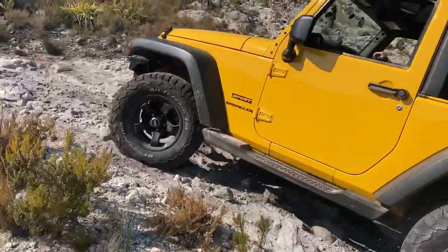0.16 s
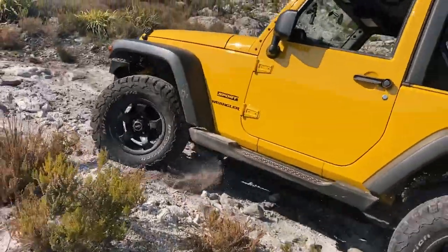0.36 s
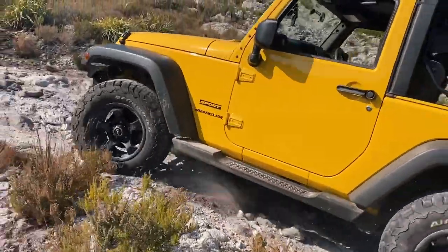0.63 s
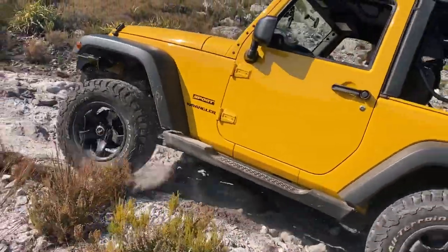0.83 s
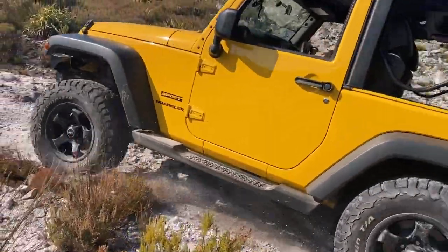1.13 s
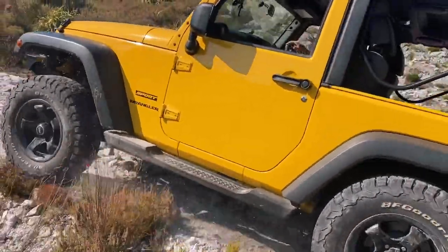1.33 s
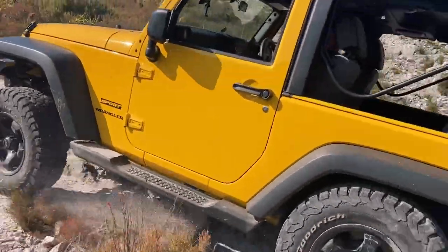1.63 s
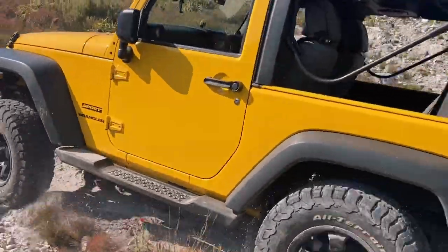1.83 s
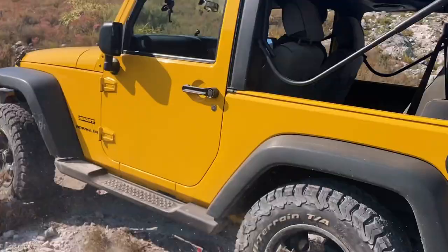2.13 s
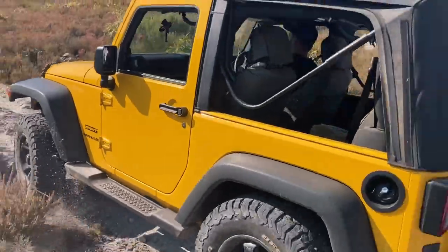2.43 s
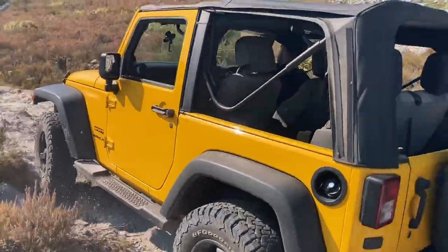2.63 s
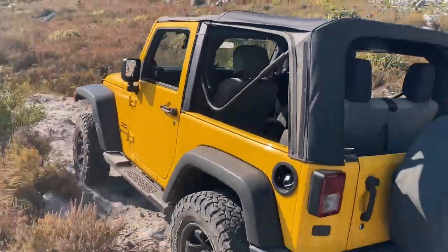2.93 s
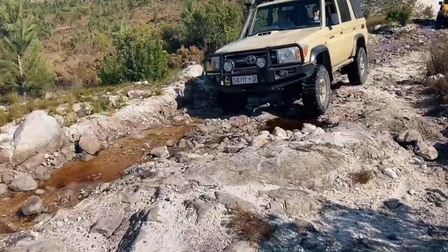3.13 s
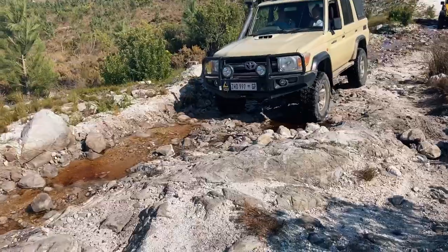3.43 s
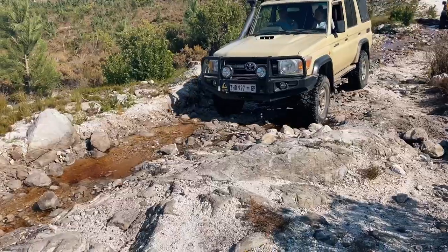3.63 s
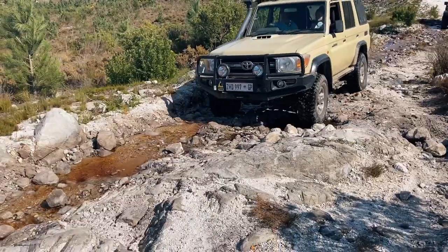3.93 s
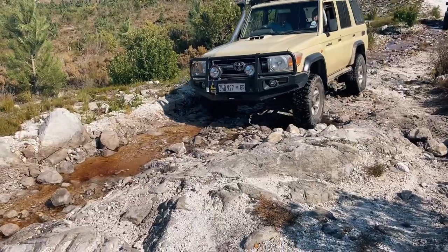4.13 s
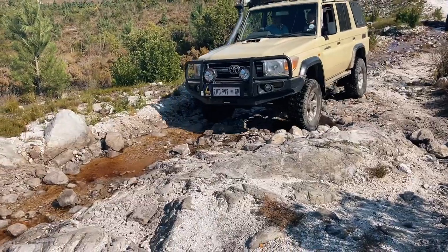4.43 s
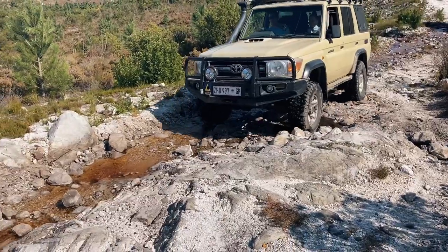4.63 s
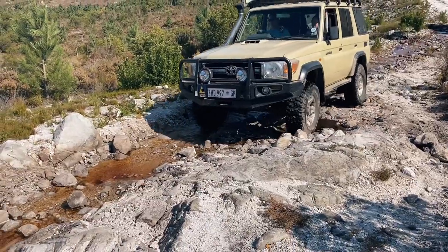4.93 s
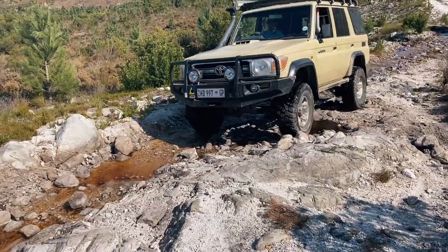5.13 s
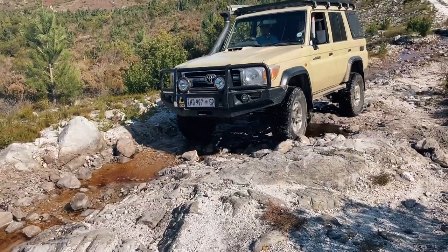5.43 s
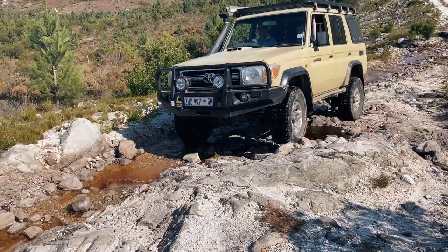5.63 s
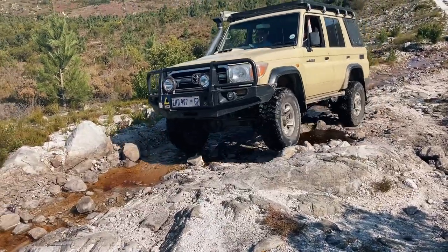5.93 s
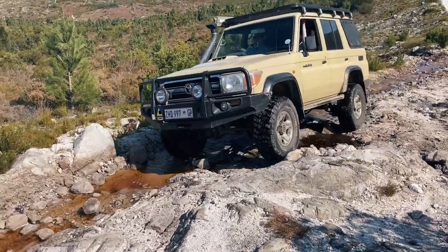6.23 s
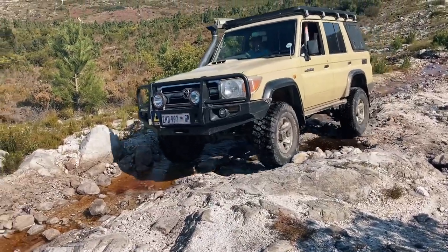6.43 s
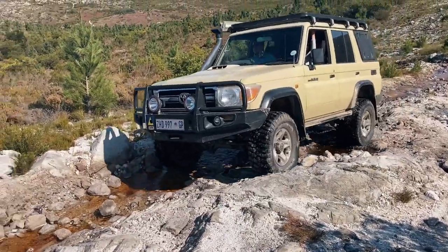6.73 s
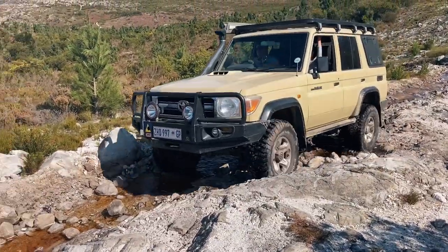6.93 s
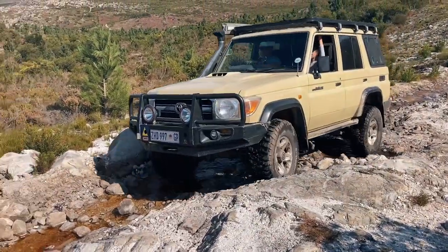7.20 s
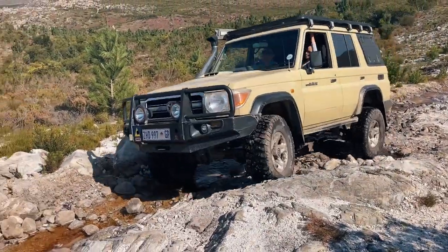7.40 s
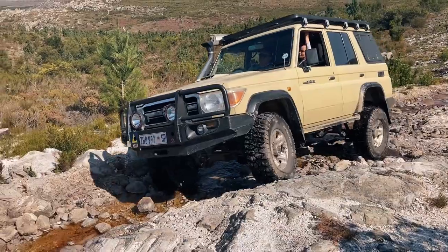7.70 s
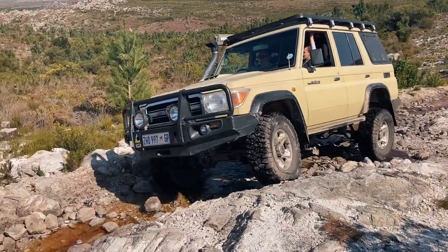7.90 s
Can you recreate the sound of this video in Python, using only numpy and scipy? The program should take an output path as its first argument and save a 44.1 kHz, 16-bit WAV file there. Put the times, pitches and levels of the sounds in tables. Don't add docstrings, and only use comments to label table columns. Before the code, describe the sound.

Outdoors on a rocky trail, in close stereo without obvious reverberation. From 0 to 3.1 seconds a petrol car scrabbles past: low body rumble, tyres grinding loose stones, bright grit spitting, and short dull rock thumps on the chassis, strongest near 1.2. A low engine hum wavers and sags, with gear tones gliding around 0.6 to 1.7; the grinding weakens after about 2.5. At 3.1 the scene cuts hard to a diesel off-roader at low, uneven idle, speeding up and slowing in waves. Exhaust throbs beneath clatter and airy fan rush, which grow nearer and fuller. Sparse stone cracks punctuate the crawl. From about 4.5 a thin, high brake squeal creeps in, wavering slightly upward, with a sharp squeak near 5.7 and repeated chirps from 6.6 to 7.7. Around 7.9 a front tyre crunches into gravel as the engine continues.

```python
import sys
import numpy as np
from scipy import signal
from scipy.fft import rfft, irfft, next_fast_len
from scipy.io import wavfile
from scipy.ndimage import uniform_filter1d, map_coordinates

SR = 44100
rng = np.random.default_rng(int(sys.argv[2]) if len(sys.argv) > 2 else 0)


def attenuation_scalar(level_db):
    decades = np.asarray(level_db, float) / 20
    return 10 ** decades


def put_to_file(sound):
    columns = np.atleast_2d(sound).T
    safe = np.clip(columns, -1, 1)
    whole_steps = np.round(safe * 32767)
    wavfile.write(sys.argv[1], SR, whole_steps.astype(np.int16))


N = 355446
TIME = np.arange(N) / SR
CUT_S = 3.105

# (frequency [Hz], density [dB per Hz])
GRIND_SPECTRUM = [(250, -23.5), (420, 1), (957, -7.5), (1090, -8), (1310, -10), (1570, -8.5), (1880, -12.5),
                  (2560, -13), (4500, -25), (5850, -24), (9900, -120)]
# (frequency [Hz], correlation [-1..1])
ALIKE_DIESEL = [(60, 0.99), (150, 1), (380, 0.95), (950, 0.66), (2380, 0.59), (5980, -0.49), (15000, 0.25)]


def unit(x):
    return x / np.sqrt(np.mean(x ** 2) + 1e-20)


def along(points, hz):
    f, v = np.transpose(points)
    return np.interp(np.log(hz + 1), np.log(f + 1), v)


def curves(rows):
    s, *cols = np.transpose(rows)
    return [np.interp(TIME, s, c) for c in cols]


def span(start_s, end_s, fade_s=.02):
    return np.clip(np.minimum(TIME - start_s, end_s - TIME) / fade_s + .5, 0, 1)


def wobble(rate_hz):
    knots = rng.standard_normal(int(N * rate_hz / SR) + 4)
    return map_coordinates(knots, [TIME * rate_hz])


def filtered(x, response):
    m = 2 * next_fast_len(N // 2 + SR // 4)
    return irfft(rfft(x, m) * response(np.fft.rfftfreq(m, 1 / SR)), m)[..., :N]


def causal(points):
    def response(hz):
        cepstrum = irfft(np.log(attenuation_scalar(along(points, hz))))
        cepstrum[1:len(hz) - 1] *= 2
        cepstrum[len(hz):] = 0
        return np.exp(rfft(cepstrum))
    return response


def rush(spectrum, alike, grain, patchy_db):
    z = signal.stft(grain * rng.standard_normal((2, N)), nperseg=256)[2]
    field = uniform_filter1d(rng.standard_normal(z.shape[1:]), 4, 0)
    field = uniform_filter1d(field, 14, 1)
    pair = signal.istft(z * attenuation_scalar(patchy_db * unit(field)), nperseg=256)[1][:, :N]

    def mid_side(hz):
        turn = np.arccos(np.clip(along(alike, hz), -1, 1)) / 2
        return attenuation_scalar(along(spectrum, hz)) * [np.cos(turn), np.sin(turn)]
    mid, side = filtered(pair, mid_side)
    return unit(np.array([mid + side, mid - side]))


def cracks(rate_hz, spread_db, t60_s):
    size_db = spread_db * np.minimum(rng.exponential(size=N), 3)
    kicks = (rng.random(N) < rate_hz / SR) * attenuation_scalar(size_db)
    return 1 + signal.lfilter([1], [1, -attenuation_scalar(-60 / (t60_s * SR))], kicks)


def petrol_tyres_and_body():
    # (time [s], effort [dB], jolt [dB])
    scrabble = [
        (0.0, -33.5, -25),
        (0.14, -33.5, -34.5),
        (0.19, -32, -21.5),
        (1.09, -34.5, -29),
        (1.33, -31, -25),
        (2.68, -42.5, -38),
        (2.69, -40.5, -30.5),
        (3.07, -39, -40.5),
        (3.1, -40.5, -31),
    ]
    # (frequency [Hz], density [dB per Hz])
    rumble_spectrum = [(12, -59), (20, -31), (40, 2), (54, 12), (140, 10), (200, 1.5), (260, -26),
                       (440, -120)]
    chassis_spectrum = [(120, -42), (190, -7), (250, -3.5), (340, -5.5), (430, -16), (700, -44.5)]
    grit_spectrum = [(2000, -0.5), (3500, -3.5), (5500, -6), (7000, -6.5), (11000, -7), (15500, -17)]
    # (frequency [Hz], correlation [-1..1])
    alike_petrol = [(60, 0.72), (150, 0.82), (380, 0.94), (950, 0.63), (2380, 0.15), (5980, -0.18),
                    (15000, 1)]
    working_db, jolt_ref_db, lurch_db, grit_fall_s = -36, -27, 1.2, 0.44

    effort_db, jolt_db = curves(scrabble) - np.array([[working_db], [jolt_ref_db]])
    thrown_db = np.interp(TIME - grit_fall_s, TIME, effort_db)
    crunch = np.sqrt(cracks(rate_hz=40, spread_db=2, t60_s=.05))
    body_shake = cracks(rate_hz=37, spread_db=1.5, t60_s=0.052)
    frame_shake = cracks(rate_hz=60, spread_db=-1.9, t60_s=0.023)
    grit_hits = crunch * cracks(rate_hz=53, spread_db=5.5, t60_s=0.0018)

    def layer(db, spectrum, grain, patchy_db):
        gain = attenuation_scalar(db + lurch_db * wobble(6.95))
        return gain * rush(spectrum, alike_petrol, grain, patchy_db)
    out = layer(-28 + 0.59 * jolt_db, rumble_spectrum, body_shake, patchy_db=0.0)
    out += layer(-30 + 0.85 * jolt_db, chassis_spectrum, frame_shake, patchy_db=1.5)
    out += layer(-34.5 + effort_db, GRIND_SPECTRUM, crunch, patchy_db=1.5)
    out += layer(-44 + 1.15 * thrown_db, grit_spectrum, grit_hits, patchy_db=0.0)
    return out


def petrol_hum():
    # (start [s], end [s], start pitch [Hz], end pitch [Hz], level [dB])
    hums = [
        (0, 0.61, 101.4, 96.5, -29.5),
        (0.555, .85, 251, 230.7, -36.5),
        (1.006, 1.4, 227.4, 254, -32.5),
        (1.307, 1.747, 250.7, 236.7, -30.5),
        (1.104, 1.4, 70, 68.5, -31),
        (1.498, 1.73, 75.5, 71.2, -29),
        (1.813, 2.41, 66.4, 53.5, -31),
        (2.423, 3.15, 89.4, 92.5, -34),
        (2.804, 3.155, 180.8, 193.2, -38.5),
    ]
    out = np.zeros(N)
    for start_s, end_s, from_hz, to_hz, db in hums:
        hz = np.interp(TIME, [start_s, end_s], [from_hz, to_hz]) * (1 + .012 * wobble(12))
        level = span(start_s, end_s, 0.092) * attenuation_scalar(db + 1.5 + 1.2 * wobble(8.3))
        out += level * np.sin(2 * np.pi * np.cumsum(hz) / SR)
    return out


def thumps():
    # (time [s], peak [dB], pitch [Hz], t60 [s])
    rocks = [(0.037, -10, 235, 0.089), (0.191, -30, 156, 0.04), (0.28, -3, 215, 0.045),
             (0.367, -25, 121, 0.032), (0.43, -17, 95.5, 0.033), (0.539, -3, 246, 0.059),
             (0.948, -8, 91.5, 0.053), (1.219, 5.5, 146, 0.026), (1.33, -1, 250, 0.03),
             (1.412, -3, 250, 0.025), (1.824, -5, 143, 0.068), (1.931, -9, 297, 0.055),
             (2.393, -3.5, 171, 0.033), (2.453, -16, 110, 0.06), (2.698, -6, 110, 0.046),
             (2.892, -15, 102, 0.045)]
    out, t = np.zeros(N + SR), np.arange(SR // 5) / SR
    for s, db, hz, t60_s in rocks:
        overtone_hz = hz * rng.uniform(1.54, 2.07)
        ring = np.sin(2 * np.pi * hz * t) + 0.38 * np.sin(2 * np.pi * overtone_hz * t)
        shape = attenuation_scalar(db - 60 * t / np.clip(t60_s, .01, .2)) * (1 - np.exp(-t / 0.006))
        out[round(s * SR):][:len(t)] += shape * ring
    return out[:N]


def exhaust(fired, exhaust_db):
    cylinders = [
        (-.88, .14),
        (.55, .02),
        (.9, .16),
    ]
    # (frequency [Hz], gain [dB])
    pipe_gain = [(20, -50), (30, -26), (38, -13), (46, -9.5), (77, -3.5), (96, -8), (115, -1), (127, 0),
                 (143, -6), (166, -22), (190, -24), (212, -20), (240, -36), (400, -70)]
    manifold_gain = [(20, -60), (55, -18), (72, -24), (102, -15), (128, -1.5), (143, -5.5), (163, -10.5),
                     (182, -20), (208, -17), (230, -28), (400, -65)]
    imbalance_db = 1

    k = np.arange(1, int(fired[-1]) + 1)
    excess, lag = np.transpose(cylinders)[:, k % 3]
    chance = rng.standard_normal((len(k), 3)) * [.003, .45, .07]

    def train(count, size):
        at = np.round(np.interp(count, fired, TIME) * SR).astype(int)
        return np.bincount(at, size, N)[:N]
    throb = filtered(train(k + chance[:, 0], attenuation_scalar(chance[:, 1])), causal(pipe_gain))
    uneven = train(k + lag, excess + chance[:, 2])
    throb += attenuation_scalar(imbalance_db) * filtered(uneven, causal(manifold_gain))
    throb /= np.sqrt(np.abs(uniform_filter1d(throb ** 2, size=SR // 5)) + 1e-12)
    return attenuation_scalar(exhaust_db + 0.42) * throb


def engine_clatter(beat, clatter_db):
    # (frequency [Hz], density [dB per Hz])
    far_spectrum = [(140, -33), (230, -4), (270, -18), (330, -12), (413, -11), (543, -12.5), (638, -19),
                    (871, -16), (1010, -24), (1300, -16.5), (1860, -24.5), (2540, -23), (4500, -37),
                    (5850, -36), (9900, -120)]
    close_spectrum = [(140, -14), (230, -2.5), (291, -4), (342, -16), (369, -2.5), (456, -2), (654, -10.5),
                      (986, -7), (1730, -14.5), (2160, -17.5), (3300, -19.5), (3640, -30.5), (4500, -36),
                      (5850, -63), (9900, -120)]
    # (frequency [Hz], width [Hz], level [dB])
    panels = [(455, 22, -10.5), (897, 67, -12.5), (1001, 40, -16.5), (1326, 54, -18.5)]

    near = np.interp(TIME, [4.8, 7.2], [0, np.pi / 2])
    shake = beat * attenuation_scalar(0.47 * wobble(9))
    clatter = np.cos(near) * rush(far_spectrum, ALIKE_DIESEL, shake, patchy_db=2.0)
    clatter += np.sin(near) * rush(close_spectrum, ALIKE_DIESEL, shake, patchy_db=3.0)
    knocks = shake * rng.standard_normal(N)
    for c, w, db in panels:
        ring = unit(filtered(knocks, lambda f: f * w / (c * c - f * f + 1j * f * w)))
        clatter += attenuation_scalar(db + 1.2 * wobble(5)) * ring
    return attenuation_scalar(clatter_db) * clatter


def fan(beat, fan_db):
    # (frequency [Hz], density [dB per Hz])
    hiss_spectrum = [(2000, -17), (4000, -0.5), (5500, -4), (7000, -10), (9000, -1.5), (11500, -6),
                     (15500, -12.5)]
    grain = beat * cracks(rate_hz=9.1, spread_db=1.5, t60_s=0.016)
    return attenuation_scalar(fan_db) * rush(hiss_spectrum, ALIKE_DIESEL, grain, patchy_db=2.5)


def diesel():
    # (time [s], firing rate [Hz], exhaust level [dB])
    idle = [(3.12, 37.6, -21), (3.33, 37.5, -19), (3.66, 45.6, -21), (3.81, 48.5, -24), (4.07, 45.5, -24),
            (4.45, 41.4, -19), (4.83, 44.5, -19), (5.2, 39.1, -19), (5.36, 41.0, -18), (5.6, 45.6, -20),
            (5.9, 40.9, -19), (6.2, 36.0, -20), (6.48, 42.9, -18), (6.7, 48.5, -23), (6.86, 47.0, -25),
            (7.29, 41.8, -20), (7.81, 43.3, -20), (8.06, 36.7, -20)]
    flywheel_s, idle_hz = .1, 43
    start_m, crawl_m_per_s = 11.14, 0.67
    bite_s, bite_db_per_s = 7.43, 8.5

    rate_hz, exhaust_db = uniform_filter1d(curves(idle), size=round(flywheel_s * SR), axis=1)
    fired = np.cumsum(rate_hz) / SR
    closer_db = -20 * np.log10(1 - crawl_m_per_s * (TIME - CUT_S) / start_m)
    closer_db += bite_db_per_s * np.clip(TIME - bite_s, 0, 1)
    clatter_db = -36.5 + closer_db + .3 * (rate_hz - idle_hz)
    fan_db = -50 + 0.69 * closer_db - 0.12 * (rate_hz - idle_hz)
    beat = 1 + .5 * np.exp(-3 * (fired % 1))
    return exhaust(fired, exhaust_db) + engine_clatter(beat, clatter_db) + fan(beat, fan_db)


def brake():
    # (time [s], pitch [Hz], level [dB])
    squeal = [(4.5, 3410, -61), (5.3, 3450, -55), (5.63, 3630, -57), (5.8, 3587, -44.5), (6.4, 3460, -55.5),
              (6.8, 3650, -51), (7.5, 3630, -49), (8.06, 3600, -51)]
    # (time [s], peak [dB])
    grabs = [(4.5894, -54), (4.7177, -52), (5.0, -50), (5.1377, -45), (5.6695, -27.5), (5.8601, -42),
             (6.34, -44), (6.6594, -38), (6.771, -40), (7.0469, -40), (7.1262, -44), (7.2714, -36),
             (7.4405, -32), (7.5492, -34), (7.642, -32), (7.9079, -45)]
    chatter_db, chatter_hz = 3.5, 20
    grab_s, grab_db = 0.032, -13

    hz, db = curves(squeal)
    chatter = wobble(18)
    bites = sum(attenuation_scalar(peak_db + grab_db) * np.exp(-((TIME - s) / grab_s - 1) ** 2) for s, peak_db in grabs)
    slips = filtered(rng.standard_normal((2, N)), lambda f: 1 / (1 + 1j * f / 105) ** 2)
    uneven = .75 + unit(slips[0]) + 1j * unit(slips[1])
    ring = uneven * np.exp(2j * np.pi * np.cumsum(hz + chatter_hz * chatter) / SR)
    level = span(4.35, 9, .2) * attenuation_scalar(db + chatter_db * chatter) + bites
    return level * unit(np.array([ring.real, (ring * np.exp(1.5j)).real]))


def stones():
    # (time [s], peak [dB], pitch [Hz], crack
    # [dB])
    crushed = [(.076, -6.5, 377, -13), (0.146, -7.5, 366, -16), (0.357, -2, 377, -30),
               (.427, -10.5, 568, -11), (.629, -14.5, 366, -2), (.674, -14, 800, -6),
               (1.474, -19, 367, -0.5), (1.526, -35, 420, 15.5), (1.63, -20, 544, 1.5),
               (1.679, -4, 574, -30), (1.767, -7, 370, -9.5), (1.819, -3.5, 382, -16),
               (2.022, -10, 357, -10.5), (2.289, -32, 377, -9), (2.393, -9.5, 360, -20),
               (2.754, -15, 357, -21), (2.845, -30, 358, -3), (2.895, -8.5, 352, -33),
               (3.329, -28, 390, 6), (4.193, -8, 415, -22), (5.402, -14, 366, -12),
                      (5.494, -12, 457, -16), (6.097, -32.5, 370, 7), (6.645, -28, 455, 6),
                      (6.677, -18.5, 458, -1), (6.955, -6.5, 630, -40), (7.62, -13, 423, -6),
                      (7.703, -23, 585, 6), (7.86, -7, 472, -25), (7.883, -11.5, 690, -27),
                      (7.886, -18, 2090, -15), (7.923, -9.5, 700, -4.5), (7.952, -15, 750, -7),
                      (7.989, -25, 541, -21)]
    # (time [s], peak [dB])
    ticks = [(0.338, -23), (0.3661, -22.5), (0.4279, -30), (1.163, -29), (1.4731, -30), (1.5306, -27),
             (1.5633, -34), (1.6227, -30), (1.7634, -23.5), (1.824, -27), (2.055, -26.5), (2.1495, -28),
             (2.2894, -29), (2.8394, -35), (3.3193, -27.5), (3.5309, -31), (4.1939, -31), (6.0964, -40),
             (6.644, -26.5), (7.138, -35), (7.234, -35), (7.614, -29.5), (7.825, -30), (7.9279, -27),
             (7.9553, -31)]
    # (frequency [Hz], level [dB])
    ping = [(5930, -33), (2827, -28), (1005, -20.5)]
    crack_hz, scrape_s, grain_db = 2400, 0.022, 3
    tick_s, tick_hz, tick_db = 0.011, 3600, -7.5
    ping_at_s, ping_length_s = .675, .026

    out, t = np.zeros((2, N + SR)), np.arange(SR // 6) / SR
    hz = np.fft.rfftfreq(len(t), 1 / SR)

    def noise_pair():
        return rfft(rng.standard_normal(len(t)) + 0.64 * rng.standard_normal((2, len(t))))

    def band(noise, c, w):
        return unit(irfft(noise * (hz / (c ** 2 - hz ** 2 + 1j * hz * w)) ** 2, len(t)))

    def place(s, x):
        out[:, round(s * SR):][:, :len(t)] += x

    for s, db, centre_hz, crack_db in crushed:
        noise = noise_pair()
        scrape = band(noise, centre_hz, 0.7 * centre_hz)
        scrape = scrape + attenuation_scalar(crack_db + 1.0) * band(noise, crack_hz, crack_hz)
        shape = (1 - np.exp(-t / 0.0023)) * np.exp(-(t / scrape_s) ** 2)
        steps = np.repeat(rng.standard_normal(len(t) // 100 + 1), 100)[:len(t)]
        place(s, attenuation_scalar(db - 19.0) * shape * attenuation_scalar(grain_db * steps) * scrape)
    for s, db in ticks:
        shape = (1 - np.exp(-t / 0.0011)) * np.exp(-t / tick_s)
        tick = unit(irfft(noise_pair() * (hz > tick_hz), len(t)))
        place(s, attenuation_scalar(db + tick_db) * shape * tick)
    for ring_hz, db in ping:
        drift = 8 / np.sqrt(ring_hz) * np.cumsum(rng.standard_normal(len(t)))
        shape = np.exp(-(2 * t / ping_length_s - 1) ** 4)
        place(ping_at_s, attenuation_scalar(db) * shape * np.sin(2 * np.pi * ring_hz * t + drift))
    return out[:, :N]


def gravel():
    crunch_s, length_s, crunch_db = 7.93, .07, -27
    grains = cracks(rate_hz=500, spread_db=3, t60_s=0.0066)
    shape = np.exp(-((TIME - crunch_s) / length_s) ** 2)
    return attenuation_scalar(crunch_db) * shape * rush(GRIND_SPECTRUM, ALIKE_DIESEL, grains, patchy_db=1.0)


def leaning(x, lean):
    return filtered(x, lambda hz: attenuation_scalar(along(lean, hz) * [[.5], [-.5]]))


def scene():
    # (frequency [Hz], difference [dB])
    lean_petrol = [(60, -1.0), (180, -0.5), (550, 0.0), (1650, 1.5), (4970, 1.5), (15000, 0.0)]
    lean_diesel = [(60, -3.0), (180, -1.5), (550, -0.5), (1650, 1.0), (4970, 0.5), (15000, 0.0)]
    second = span(CUT_S, 99, 0.0046)
    grit = stones()
    first_shot = leaning(petrol_tyres_and_body() + petrol_hum() + thumps() + grit, lean_petrol)
    second_shot = leaning(diesel() + brake() + gravel() + grit, lean_diesel)
    return (1 - second) * first_shot + second * second_shot


def band_limit(x):
    return signal.sosfilt(signal.butter(12, 17080, fs=SR, output="sos"), x)


def record(dry):
    mono_hz, top_hz, lag_s = 6150, 15870, 2.2e-4
    low = filtered(dry, lambda hz: (hz < mono_hz) / (1 + (27 / (hz + 1)) ** 6))

    def top_band(hz):
        half_turn = np.exp(1j * np.pi * (hz * lag_s + .5) * np.array([[1], [-1]]))
        return (hz >= mono_hz) * (hz < top_hz) * half_turn
    high = filtered(1.18 * dry[0] + 0.033 * dry, top_band)
    return band_limit(low + high)


dry = scene()
out = record(dry)
put_to_file(out)
```